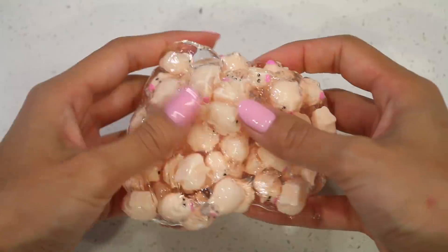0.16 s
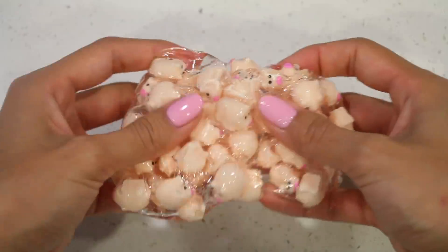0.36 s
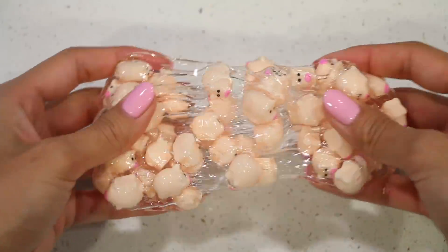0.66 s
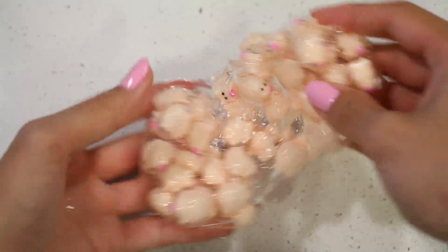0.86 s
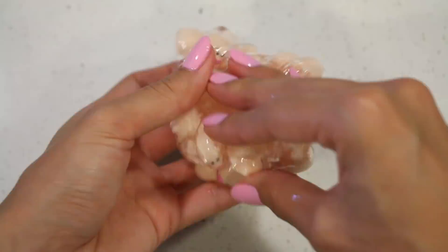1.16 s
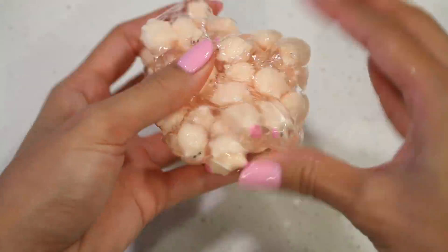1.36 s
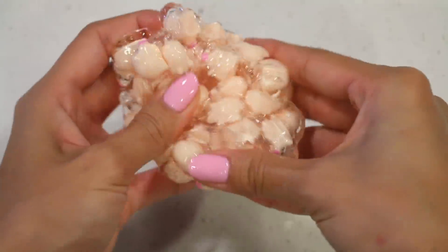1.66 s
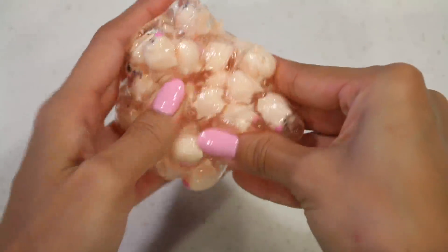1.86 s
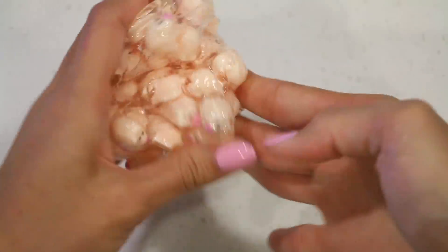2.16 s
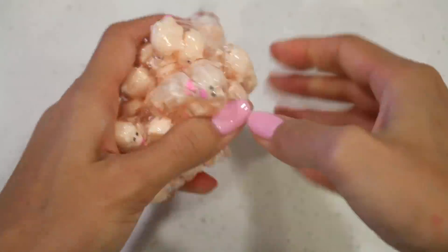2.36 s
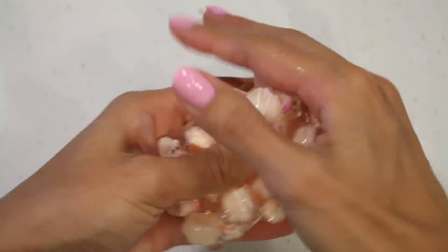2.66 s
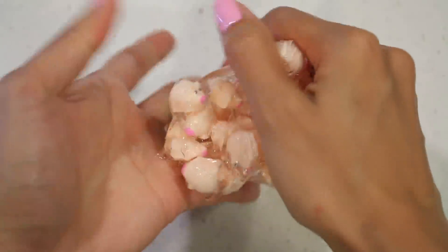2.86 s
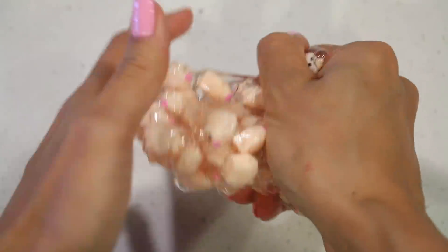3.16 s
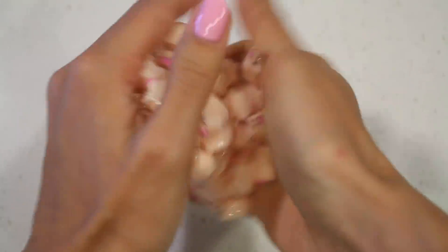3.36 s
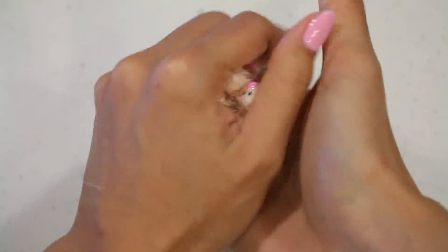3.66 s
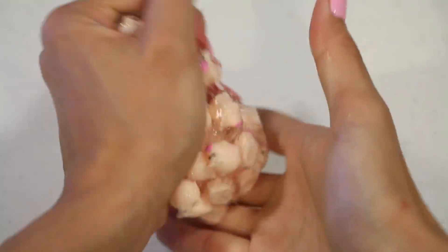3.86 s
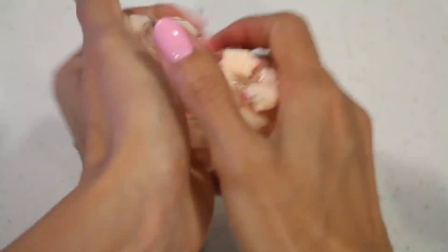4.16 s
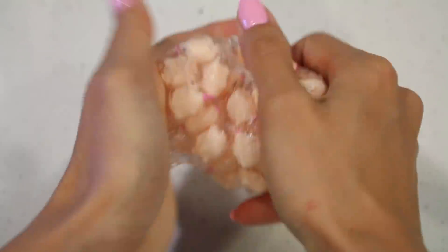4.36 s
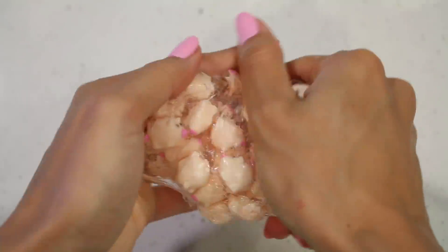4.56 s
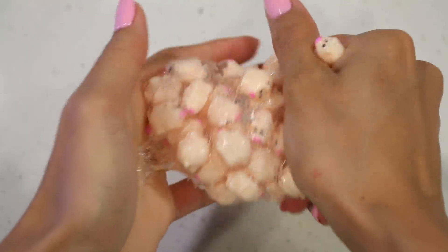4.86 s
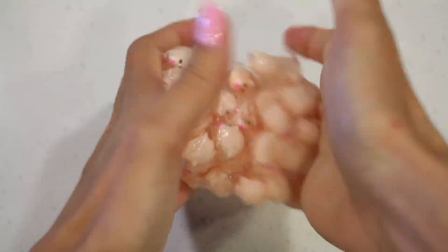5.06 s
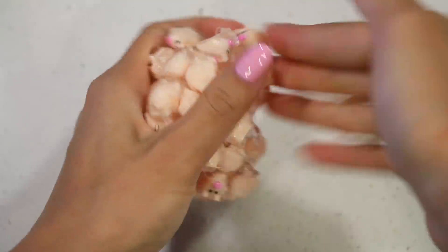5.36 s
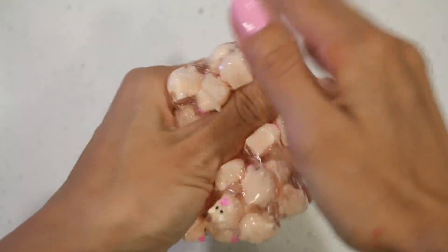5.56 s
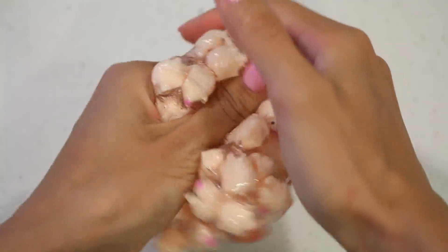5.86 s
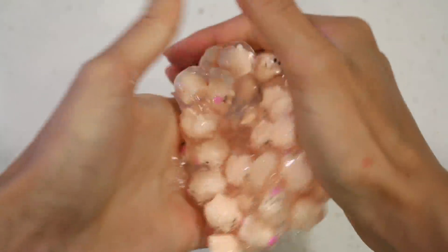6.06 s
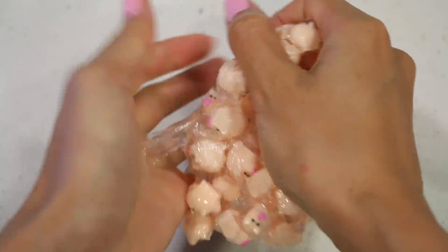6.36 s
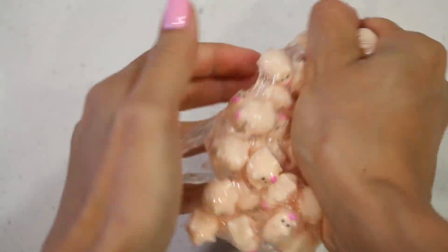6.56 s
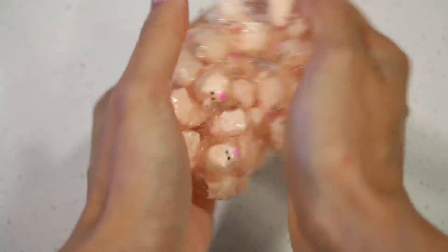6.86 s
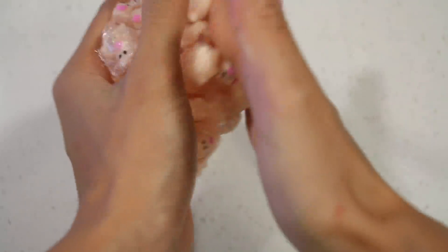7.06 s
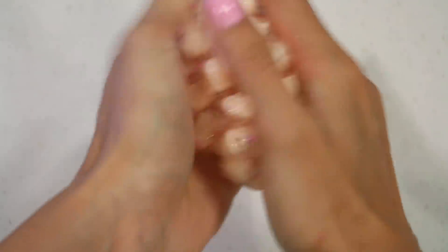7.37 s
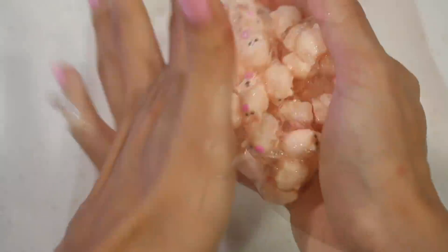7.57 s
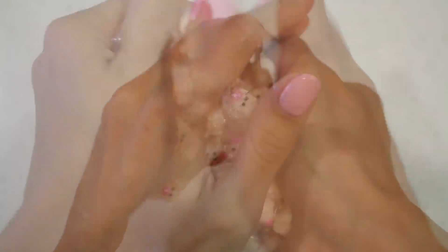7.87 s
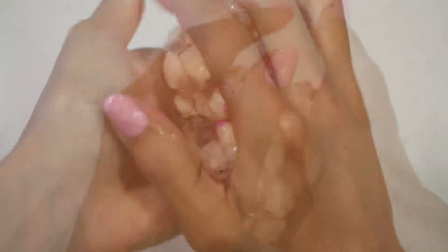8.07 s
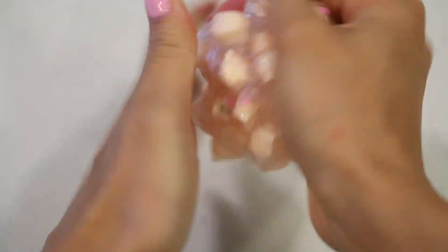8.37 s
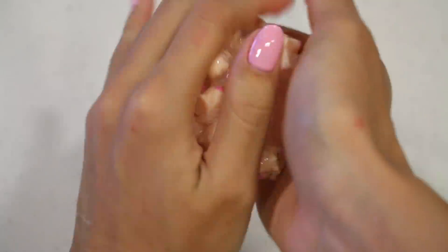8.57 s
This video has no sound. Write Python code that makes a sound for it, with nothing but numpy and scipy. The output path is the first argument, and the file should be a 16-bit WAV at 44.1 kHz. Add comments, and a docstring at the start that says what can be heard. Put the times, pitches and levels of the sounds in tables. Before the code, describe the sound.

Close to one microphone in a small hard room, hands knead sticky slime packed with little plastic charms. The first second and a half is nearly quiet, with only faint pops; then clusters of bright air pops, plastic ticks and moist crackling come in irregular squeezes. One very loud pop stands out before the middle. A soft low ventilation drone runs steadily underneath.

```python
"""A small hard room under low ventilation drone: clear slime packed with plastic charms is squeezed and
pulled apart close to one microphone. Air pockets pop as gliding rings, each at its own pitch; charms tick
and films snap as rings inside noise cracks; kneading crackles as random clicks through resonances.
A hand bumps the table once. Echoes and decaying noise bands answer the slime; shaped noise,
resonances and motor tones make the ventilation."""
import sys
import numpy as np
from scipy import signal
from scipy.fft import rfft, irfft, next_fast_len
from scipy.io import wavfile

SR = 44100
rng = np.random.default_rng(int(sys.argv[2]) if len(sys.argv) > 2 else 0)


def field_ratio(decibels):
    """Amplitude ratio for a level in dB (20 dB per decade); scalars and array-likes work."""
    return 10 ** (np.asarray(decibels, dtype=float) / 20)


def output_pcm(signal):
    """Save a mono or channel-first signal as 16-bit PCM at the path in sys.argv[1].

    Samples are clipped to [-1, 1] before scaling.
    """
    pcm = np.clip(np.atleast_2d(signal).T, -1, 1) * 32767
    wavfile.write(sys.argv[1], SR, np.round(pcm).astype(np.int16))


N = 384543


def rms_one(x):
    """Scale to unit rms."""
    return x / np.sqrt(np.mean(x ** 2) + 1e-20)


def band(x, low_hz, high_hz):
    """Butterworth band-pass, upper edge held to 0.45 SR."""
    edges_hz = [low_hz, min(high_hz, 0.45 * SR)]
    return signal.sosfilt(signal.butter(2, edges_hz, "band", fs=SR, output="sos"), x)


def resonate(x, hz, width_hz):
    """Two-pole resonance with gain 1 on top."""
    r = np.exp(-np.pi * width_hz / SR)
    zeros = [(1 - r * r) / 2, 0, (r * r - 1) / 2]
    poles = [1, -2 * r * np.cos(2 * np.pi * hz / SR), r * r]
    return signal.lfilter(zeros, poles, x)


def burst(hz, cycles, glide):
    """A ring that swells, dies after some cycles and glides up as the opening widens; envelope peak 1."""
    turns = np.arange(400) / SR * hz
    u = turns / max(cycles, 0.7)
    envelope = u * np.exp(1 - u)
    return envelope * np.sin(2 * np.pi * turns * (1 + glide * np.tanh(u / 4)))


def add(out, s, grain):
    """Mix a grain in at a time."""
    i = round(s * SR)
    out[i:i + len(grain)] += grain[:N - i]


def pops():
    """A pocket rings over a low push, with side rings, stronger in short pops; the torn film snaps faintly."""
    # air pockets bursting: t/s, level/dB, f/Hz, swell/cycles (burst sets a floor)
    pockets = [(0.289, -37, 1820, 0.7), (0.3182, -23, 2660, 0.23), (0.666, -29, 3750, 0.66),
               (0.675, -34, 3850, 1.9), (1.02, -34.5, 2880, 0.5), (1.106, -33, 1900, 0.5),
               (1.165, -35.5, 2700, 1.5), (1.598, -33.5, 2900, 1), (1.6639, -16, 2980, 0.92),
               (1.7552, -22.5, 4270, 0.44), (1.7852, -19.5, 3600, 1.6), (1.8061, -15, 3200, 0.6),
               (1.884, -22, 3750, 1.2), (1.892, -27.5, 1540, 0.83), (1.9006, -21, 3360, 1.2),
               (1.9291, -23, 3300, 0.55), (1.9531, -22, 2150, 0.93), (1.9706, -23, 3450, 0.83),
               (1.9794, -27, 1760, 0.59), (2.06, -22.5, 4200, 0.73), (2.0802, -25.5, 1290, 0.28),
               (2.1, -33, 2200, 0.4), (2.252, -27, 3580, 0.88), (2.273, -29.5, 2170, 1),
               (2.324, -27, 1650, 1.1), (2.3959, -28, 2140, 0.92), (2.424, -25.5, 2200, 0.74),
               (2.5347, -27, 2970, 0.79), (2.5832, -23.5, 3220, 0.36), (2.613, -28.5, 3670, 0.64),
               (2.651, -22.5, 2860, 1.65), (2.796, -17, 3740, 1.15), (3.1325, -19, 2390, 0.63),
               (3.2204, -16, 3550, 0.8), (3.273, -24, 3070, 0.8), (3.435, -21, 2370, 1.3),
               (3.4538, -21, 3550, 2.1), (3.4966, -17, 3020, 1.3), (3.588, -17, 3160, 1.6),
               (3.59, -25, 3700, 3.9), (3.735, 0.5, 2365, 1.62), (3.863, -11, 3980, 0.78),
               (3.9623, -17.5, 4250, 1.3), (4.0027, -16.5, 3630, 1.6), (4.0521, -10, 3600, 1),
               (4.214, -25, 3850, 1.7), (4.249, -19.5, 3510, 3.4), (4.6102, -13, 2770, 0.65),
               (4.6553, -11, 3660, 1.4), (4.666, -16, 3220, 0.6), (4.688, -18, 3730, 0.54),
               (4.701, -19, 2060, 0.26), (4.7457, -8.5, 3120, 0.32), (4.8596, -17, 3190, 0.18),
               (5.0107, -18, 3660, 2.8), (5.0156, -18.5, 3050, 1.6), (5.1985, -15, 4140, 0.81),
               (5.205, -24, 3220, 0.51), (5.449, -21, 2860, 0.68), (5.4606, -14.5, 3630, 1.7),
               (5.555, -21, 2220, 1), (5.571, -15.5, 2490, 1), (5.61, -21, 3620, 0.94),
               (5.624, -26, 3370, 2.5), (5.628, -17, 3270, 0.54), (5.6433, -22, 1490, 0.4),
               (5.6989, -24.5, 1450, 0.37), (5.773, -20, 3280, 1.8), (5.7807, -21.5, 2400, 1.4),
               (5.9871, -15, 3180, 0.72), (6.014, -21, 3770, 2.5), (6.022, -14.5, 3120, 1.7),
               (6.034, -22.5, 2560, 1.7), (6.1787, -21.5, 3100, 0.28), (6.2596, -19, 3060, 0.42),
               (6.49, -11, 3230, 0.97), (6.527, -23.5, 2070, 0.58), (6.5723, -13, 3280, 1.5),
               (6.5876, -7.5, 4500, 1.27), (6.595, -19, 4800, 1.08), (6.6028, -4.5, 3740, 1.6),
               (6.61, -14, 2970, 1.4), (6.63, -11, 3320, 0.39), (6.823, -21, 3240, 2.8),
               (6.83, -20.5, 3330, 0.75), (6.834, -14, 3900, 0.46), (6.965, -23.5, 3250, 0.33),
               (6.975, -22.5, 1870, 0.83), (7.0317, -26, 2730, 0.44), (7.0734, -24, 3640, 2.4),
               (7.0819, -14, 3340, 0.72), (7.1749, -18.5, 3600, 3.8), (7.1875, -12, 3360, 0.9),
               (7.231, -31.5, 2600, 2.8), (7.2705, -18.5, 3500, 0.54), (7.4678, -25, 3060, 0.85),
               (7.48, -10.5, 2960, 1.08), (7.759, -22.5, 3470, 0.97), (7.806, -30.5, 2840, 3),
               (7.83, -31, 2680, 0.83), (7.862, -30, 2040, 1.6), (7.8935, -16, 3520, 0.82),
               (8.1363, -31, 2490, 0.74), (8.21, -23, 2470, 0.49), (8.2374, -27.5, 3170, 1.4),
               (8.325, -25.5, 3260, 1.1), (8.352, -21, 2760, 1.03), (8.3762, -30.5, 3700, 1.5),
               (8.428, -28, 3350, 0.97)]
    # side rings of the same pop, before random detuning: f ratio/1, level/dB
    side_rings = [(0.601, -25), (.8, -22), (1.35, -20.5)]
    out, t = np.zeros(N), np.arange(400) / SR
    chance = rng.standard_normal((len(pockets), 11))
    tear = rng.standard_normal((len(pockets), 400))
    for (s, db, hz, cycles), (push_pitch, push_size, *side), noise in zip(pockets, chance, tear):
        shortness = np.clip(1.6 - cycles, 0, 1)
        ring = field_ratio(-3.5 * shortness) * burst(hz, cycles + 0.077 * shortness, glide=0.0078)
        push_gain = field_ratio(-20.5 + 2 * push_size) * (2400 / hz) ** 2
        push = push_gain * burst(1250 * field_ratio(push_pitch), 1.1, glide=0.05)
        snap = field_ratio(-33.5) * noise * np.exp(-t / 0.0043)
        add(out, s, field_ratio(db) * (ring + push + snap))
        for (ratio, side_db), (detune, late, size) in zip(side_rings, np.reshape(side, (3, 3))):
            gain = field_ratio(db + side_db + 10 * shortness + 2 * size)
            side_hz = hz * ratio * field_ratio(1.8 * detune)
            add(out, s + 0.0004 * abs(late), gain * burst(side_hz, 1.52, glide=0.12))
    return out


def ticks():
    """A charm tick or film snap: a short ring inside a broad crack that spreads around its pitch."""
    # charms ticking, films snapping: t/s, level/dB, f/Hz
    contacts = [(0.674, -40.5, 8100), (1.663, -26, 7400), (1.9537, -26, 7700), (2.5504, -21.5, 8900),
                (2.641, -37, 1400), (2.802, -29.5, 3960), (3.0687, -37, 14200), (3.0878, -31, 3700),
                (3.132, -26.5, 12000), (3.153, -34, 3140), (3.22, -20, 9550), (3.234, -28, 6860),
                (3.4571, -26.5, 10300), (3.4827, -28, 3600), (3.663, -37, 10000), (3.7146, -36.5, 2580),
                (3.735, -31, 6500), (3.8456, -27, 6300), (3.8627, -29, 6400), (3.8899, -29.5, 2200),
                (3.9474, -33.5, 9300), (3.963, -24.5, 1420), (3.9773, -29, 3930), (4.035, -29, 7800),
                (4.0595, -27, 8400), (4.0793, -35, 1630), (4.274, -27, 7500), (4.5824, -32.5, 2380),
                (4.61, -13.5, 7600), (4.637, -29, 6270), (4.7009, -26, 5800), (4.7742, -27.5, 5500),
                (4.803, -29, 3800), (4.8576, -27.5, 6470), (4.9983, -29, 3370), (5.0302, -27, 3700),
                (5.033, -27.5, 2850), (5.1882, -30, 4000), (5.1983, -9.5, 7960), (5.201, -18, 11000),
                (5.209, -31, 8450), (5.275, -34.5, 2970), (5.5543, -30.5, 7800), (5.569, -26.5, 6400),
                (5.604, -19.5, 5640), (5.6057, -24, 3480), (5.7193, -37, 1960), (5.7606, -27, 8600),
                (5.8285, -21, 11000), (5.8412, -37, 1250), (6.0217, -26, 7600), (6.0999, -31, 7200),
                (6.1046, -33, 6900), (6.534, -29.5, 3040), (6.554, -27.5, 13500), (6.581, -27, 3850),
                (6.6, -25.5, 6940), (6.63, -26.5, 6150), (6.824, -31.5, 6940), (6.835, -30, 9200),
                (7.195, -35, 3600), (7.4548, -36.5, 4140), (7.569, -33.5, 3200), (7.8122, -30, 2600),
                (7.948, -31.5, 7100), (7.9481, -34.5, 2340), (8.315, -39, 7600), (8.429, -30.5, 6600)]
    out, t = np.zeros(N), np.arange(400) / SR
    for (s, db, hz), noise in zip(contacts, rng.standard_normal((len(contacts), 400))):
        crack = band(noise * np.exp(-t / 0.0007), 0.55 * hz, 1.7 * hz) * np.sqrt(8000 / hz)
        ring = burst(hz, 1.56, glide=0.013)
        add(out, s, field_ratio(db) * (field_ratio(1) * ring + field_ratio(2) * crack))
    return out


def crackle(base_per_s, spread_db, low_hz, high_hz, cycles, tilt_db):
    """Clumped random clicks dealt to 12 resonances spread in pitch, levels tilted low to high; rms 1."""
    clump = np.interp(np.arange(N), np.arange(0, N + 400, 400), rng.standard_normal(N // 400 + 2))
    born = rng.random(N) < base_per_s * field_ratio(5 * clump) / SR
    heights = field_ratio(spread_db * np.minimum(rng.exponential(1, N), 3))
    clicks = heights * rng.choice([-1, 1], N) * born
    dealt = rng.integers(0, 12, N)
    out = np.zeros(N)
    for k, hz in enumerate(np.geomspace(low_hz, high_hz, 12)):
        share = clicks * (dealt == k) + 1e-18      # offset avoids denormals
        ring = resonate(resonate(share, hz, hz / cycles), hz, hz / cycles)
        out += field_ratio(tilt_db * k / 11) * ring
    return rms_one(out)


def effort(column):
    """Gain of one crackle layer: every squeeze rises fast and fades over the slow creep."""
    # squeezes and pulls: peak t/s, small pops level/dB, fizz level/dB, fade/s
    squeezes = [(1.14, -56.5, -89, 0.45), (1.668, -53, -76, 0.67), (1.892, -47, -74, 0.19),
                (1.956, -40, -46.5, 0.13), (2.072, -43.5, -50, 0.14), (2.398, -41.5, -64, 0.058),
                (2.648, -47.5, -72, 0.5), (2.789, -43.5, -47, 0.13), (3.135, -48.5, -71, 0.95),
                (3.45, -32.5, -48, 0.28), (3.833, -40, -55, 0.93), (3.982, -41, -48.5, 0.48),
                (4.251, -39.5, -50, 0.45), (4.611, -39, -70, 0.29), (4.742, -38.5, -45.5, 0.31),
                (5.019, -37.5, -49, 0.46), (5.218, -45, -45.5, 0.52), (5.619, -39, -48.5, 0.82),
                (5.768, -41, -56, 0.33), (6.01, -30, -44.5, 0.11), (6.595, -39.5, -50, 0.29),
                (6.83, -45, -52.5, 0.48), (7.467, -37, -54.5, 0.2), (7.82, -49.5, -57, 0.35),
                (8.344, -45, -50, 0.4)]
    # slime creeping between squeezes: t/s, small pops level/dB, fizz level/dB
    creep = np.transpose([(0.0, -63, -75.5), (1.0, -70, -73), (2.2, -61, -72), (3.6, -63, -68),
                          (5.4, -63, -76.5), (6.3, -55, -65), (7.6, -57, -67), (8.72, -59.5, -64)])
    fade_db, rise_share = 54, 0.38      # fall per fade time; rise time over fade time
    t = np.arange(0, N, 32) / SR
    power = field_ratio(2 * np.interp(t, creep[0], creep[column]))
    for row in squeezes:
        late = (t - row[0]) / row[3]
        below_peak_db = fade_db * np.maximum(late, -late / rise_share)
        power = power + field_ratio(2 * (row[column] - below_peak_db))
    return np.interp(np.arange(N) / SR, t, np.sqrt(power))


def kneading():
    """Small pops over a dense wet squelch, and a fine fizz as slime peels off skin and charms."""
    small = crackle(400, 4.8, 1274, 3730, cycles=2.76, tilt_db=2)
    wet = crackle(1300, 4.2, 1990, 3970, cycles=2.85, tilt_db=9)
    fizz = crackle(1100, 4.8, 5800, 15200, cycles=3.8, tilt_db=-7.5)
    return effort(1) * (small + field_ratio(-7) * wet) + effort(2) * fizz


def thud():
    """A hand bumps the table: one dull knock, a low sine that swells and dies."""
    # t/s, level/dB, f/Hz
    s, db, hz = (6.1815, -29, 200)
    t = np.arange(N) / SR - s
    u = np.maximum(t, 0) / 0.004
    return field_ratio(db) * u * np.exp(1 - u) * np.sin(2 * np.pi * hz * t)


def room(x):
    """A few dull near echoes, then noise that builds up and dies band by band."""
    # table and near walls: delay/s, level/dB before band-pass
    echoes = [(.0072, -21), (0.0099, -17.5)]
    # octave bands of the tail: f/Hz, t60/s, level/dB before bandwidth weighting
    tail_bands = [(1060, 0.4, -8.5), (2200, 0.46, -18), (3600, 0.4, -10), (7600, 0.59, -14.5),
                  (13500, 0.25, -15.5)]
    t = np.arange(SR // 2) / SR
    answer = np.zeros(len(t))
    for s, db in echoes:
        answer[round(s * SR)] += field_ratio(db)
    answer = band(answer, 370, 8000)
    for hz, t60, db in tail_bands:
        tail = band(rng.standard_normal(len(t)), hz / np.sqrt(2), hz * np.sqrt(2))
        tail *= field_ratio(-60 * t / t60) * np.tanh(t / 0.00067)
        width = np.sqrt(2 * hz / SR)      # a wider band carries a larger share of a click
        answer += field_ratio(db) * width * tail / np.sqrt(np.sum(tail ** 2))
    return signal.fftconvolve(x, answer)[:N]


def air():
    """Ventilation: steady shaped noise with a few narrow resonances and motor tones in the bass."""
    # noise spectrum: f/Hz, relative level/dB
    spectrum = np.array([(22, -33), (40, -12.5), (70, 1), (100, -6), (140, -4.5), (250, -5.5), (320, -12),
                         (480, -12), (560, -19), (1000, -19.5), (1700, -27), (4200, -36), (5000, -40),
                         (9000, -54), (15500, -41)])
    # room resonances in the draught: f/Hz, width/Hz, rms level/dB
    drone = [(132.1, 13, -51), (208.4, 6.1, -58.5), (408.4, 10.4, -59.5)]
    # steady motor tones: f/Hz, rms level/dB
    hum = [(120.1, -52)]
    size = next_fast_len(N)
    bin_hz = np.maximum(np.arange(size // 2 + 1) * SR / size, 1)
    shape = field_ratio(np.interp(np.log(bin_hz), np.log(spectrum[:, 0]), spectrum[:, 1]))
    noise = irfft(rfft(rng.standard_normal(size)) * shape, size)[:N]
    out = field_ratio(-49) * rms_one(noise)
    for hz, width_hz, db in drone:
        ringing = resonate(rng.standard_normal(N + SR), hz, width_hz)[SR:]      # skip the onset
        out += field_ratio(db) * rms_one(ringing)
    for hz, db in hum:
        turns = hz * np.arange(N) / SR + rng.random()
        out += field_ratio(db) * np.sqrt(2) * np.sin(2 * np.pi * turns)
    return out


def scene():
    """Such small sources radiate no bass; one microphone feeds both channels."""
    slime = band(pops() + ticks() + kneading(), 800, SR / 2)
    return np.tile(slime + room(slime) + thud() + air(), (2, 1))


def band_limit(x):
    """A steep low-pass at the top of the band."""
    return signal.sosfilt(signal.butter(12, 17070, fs=SR, output="sos"), x)


def record(dry):
    """The top is cut steeply towards 16 kHz, then peaks are clipped."""
    top_cut = signal.cheby2(8, 30, 16000, fs=SR, output="sos")
    mix = np.clip(signal.sosfilt(top_cut, dry), -0.97, 0.97)
    return band_limit(mix)


dry = scene()
out = record(dry)
output_pcm(out)
```